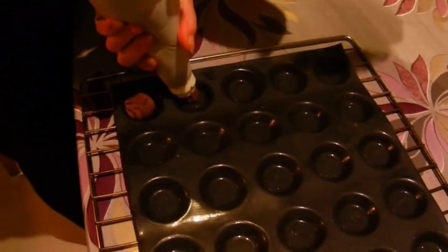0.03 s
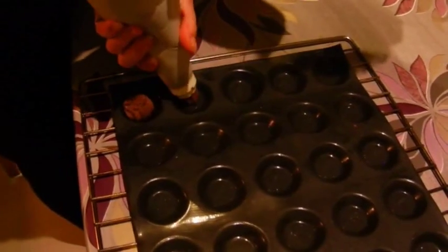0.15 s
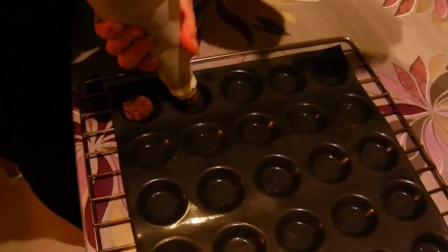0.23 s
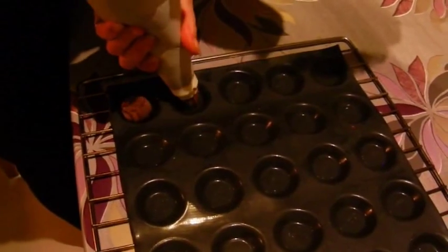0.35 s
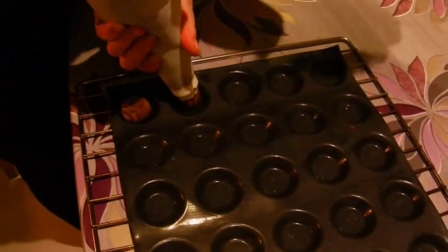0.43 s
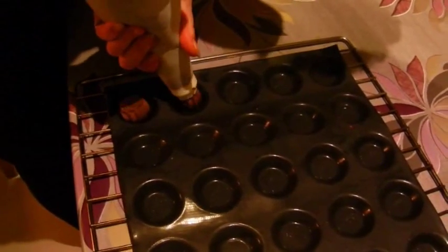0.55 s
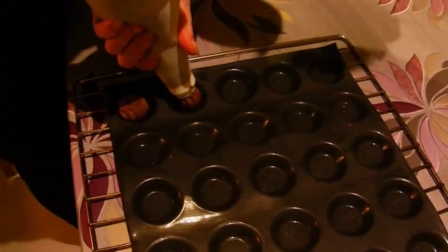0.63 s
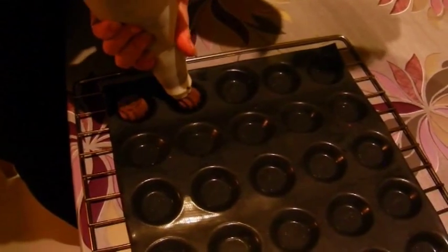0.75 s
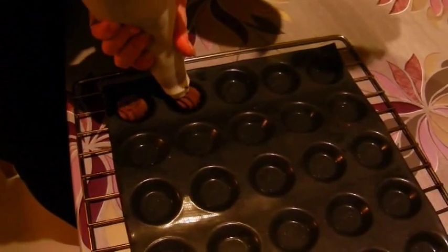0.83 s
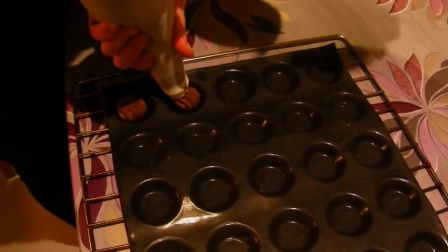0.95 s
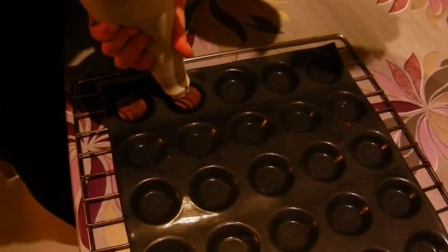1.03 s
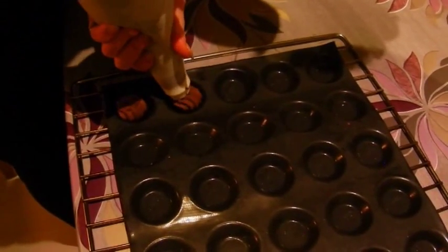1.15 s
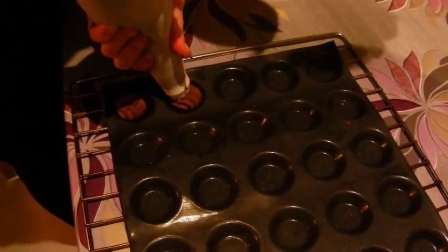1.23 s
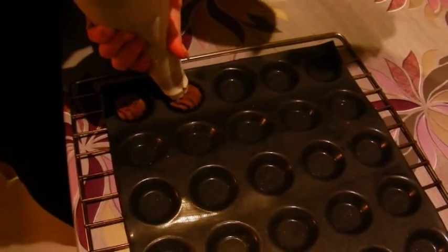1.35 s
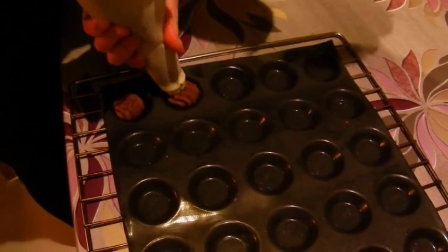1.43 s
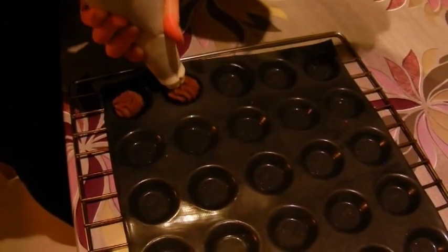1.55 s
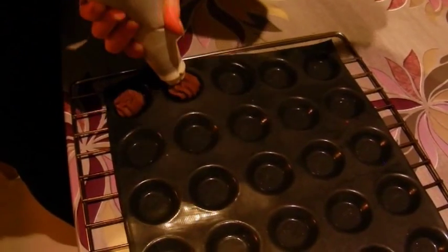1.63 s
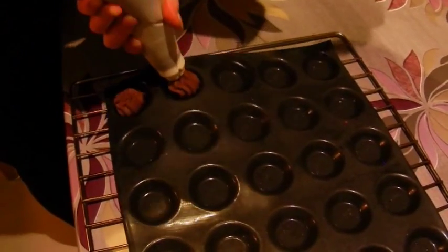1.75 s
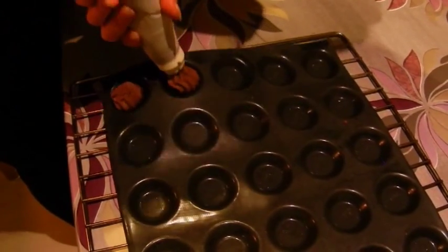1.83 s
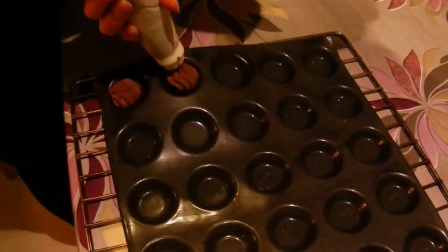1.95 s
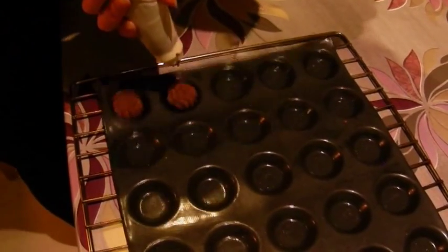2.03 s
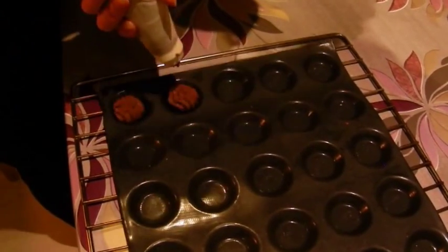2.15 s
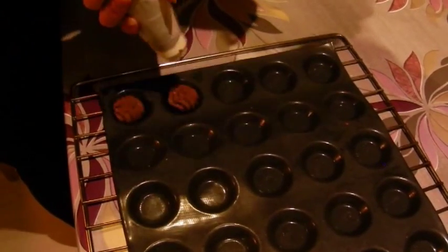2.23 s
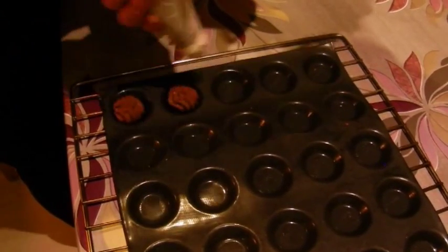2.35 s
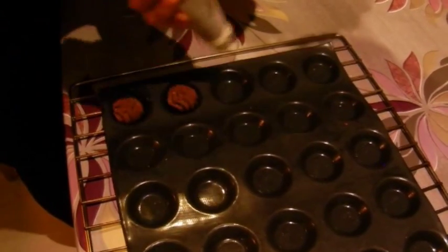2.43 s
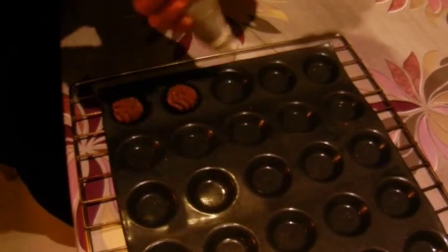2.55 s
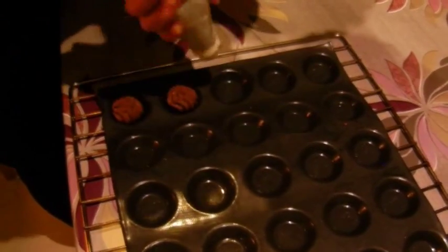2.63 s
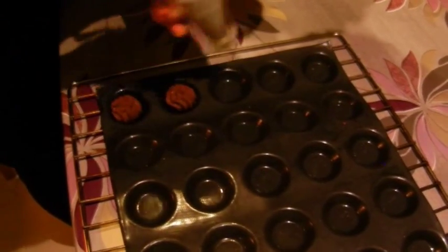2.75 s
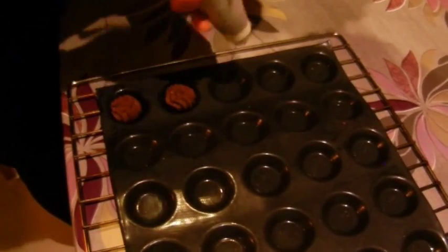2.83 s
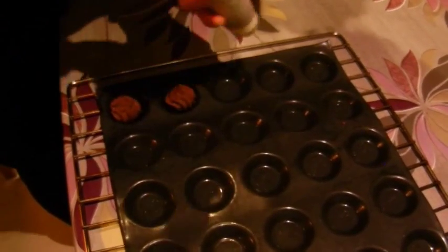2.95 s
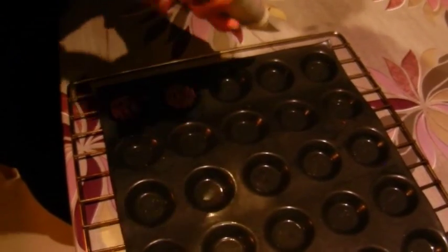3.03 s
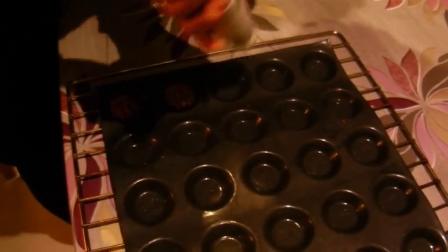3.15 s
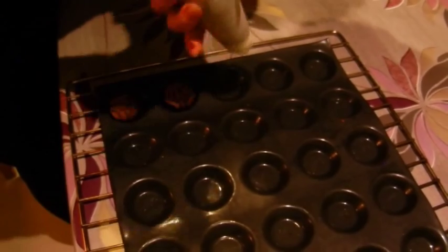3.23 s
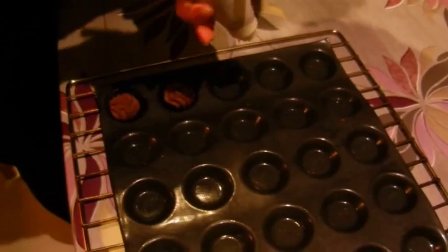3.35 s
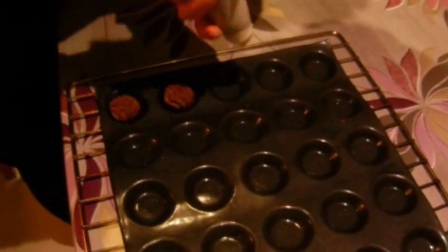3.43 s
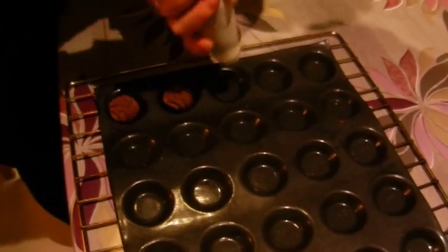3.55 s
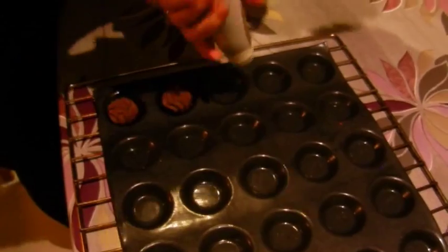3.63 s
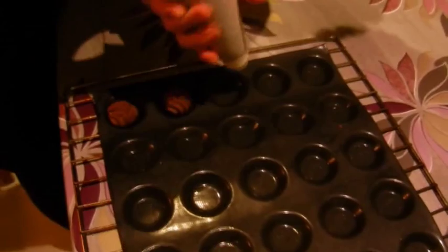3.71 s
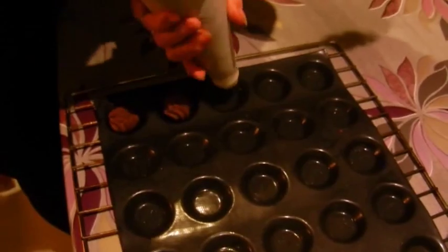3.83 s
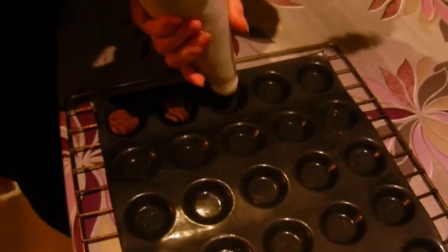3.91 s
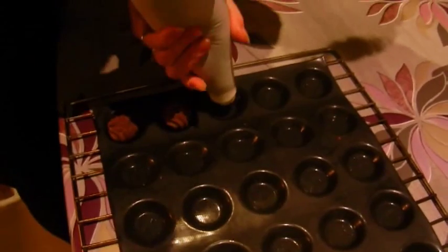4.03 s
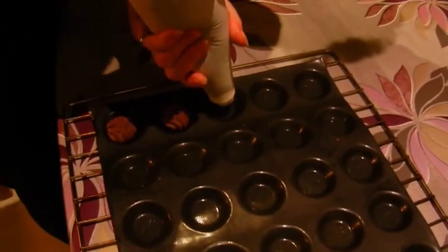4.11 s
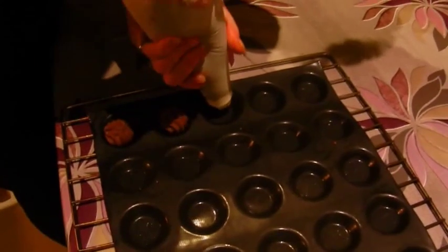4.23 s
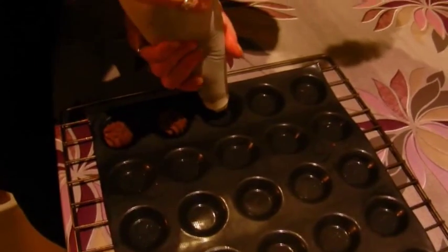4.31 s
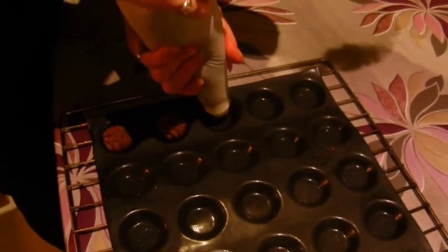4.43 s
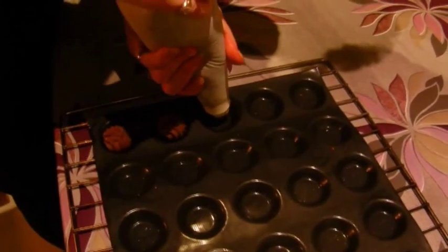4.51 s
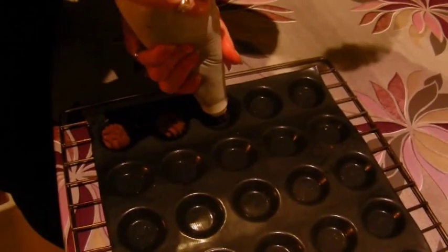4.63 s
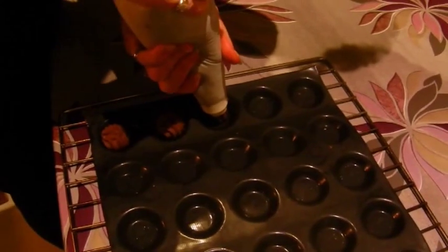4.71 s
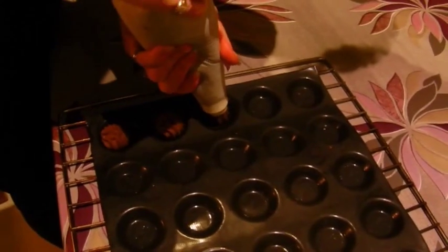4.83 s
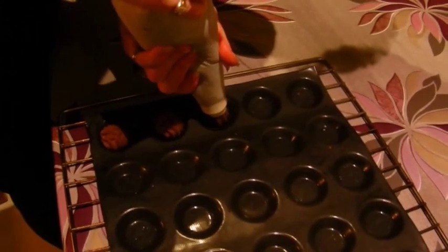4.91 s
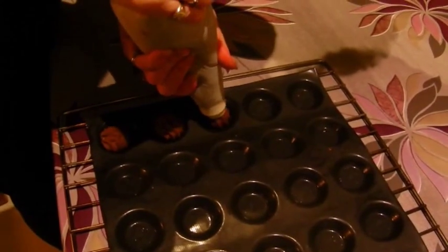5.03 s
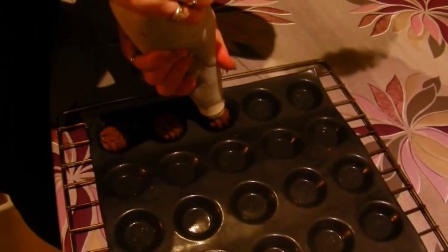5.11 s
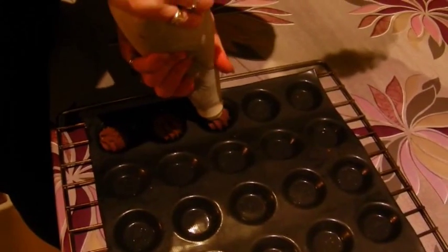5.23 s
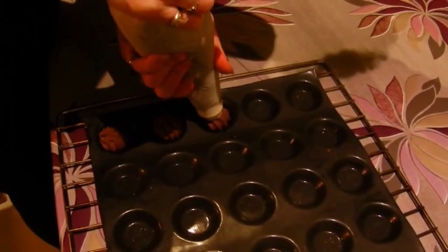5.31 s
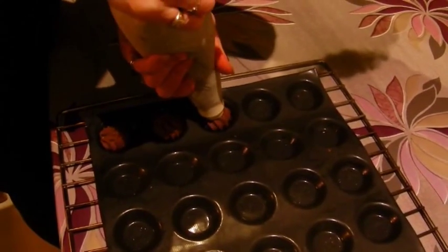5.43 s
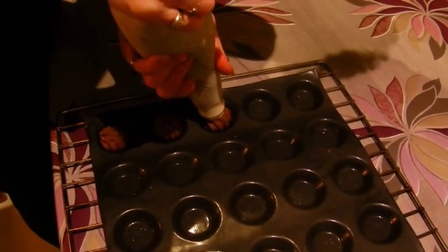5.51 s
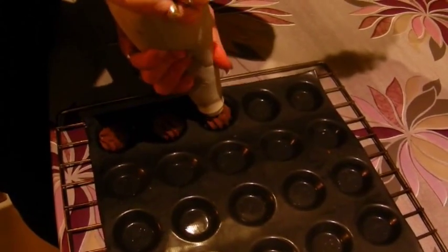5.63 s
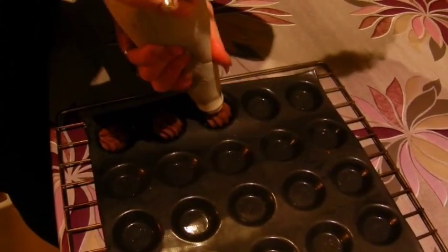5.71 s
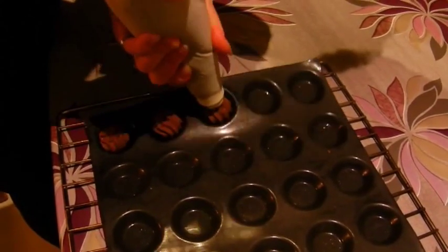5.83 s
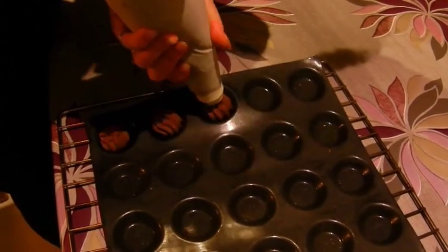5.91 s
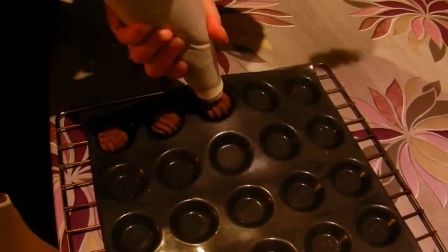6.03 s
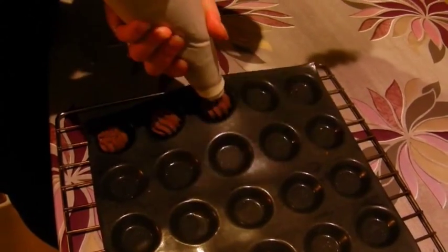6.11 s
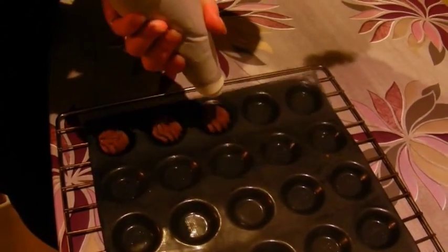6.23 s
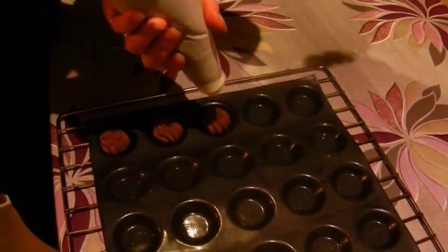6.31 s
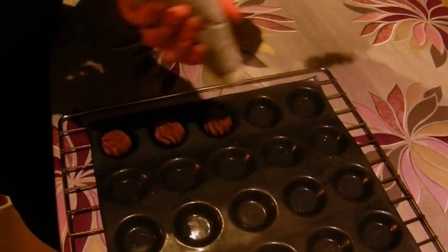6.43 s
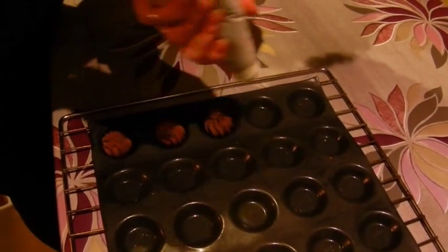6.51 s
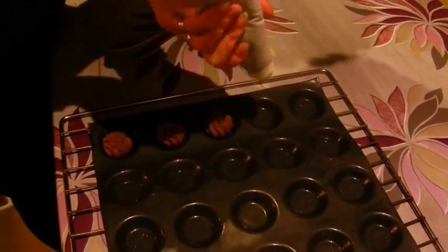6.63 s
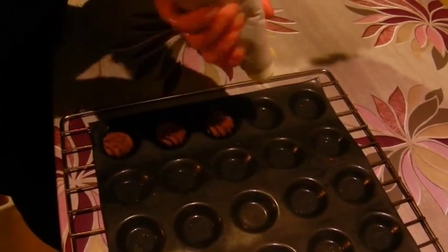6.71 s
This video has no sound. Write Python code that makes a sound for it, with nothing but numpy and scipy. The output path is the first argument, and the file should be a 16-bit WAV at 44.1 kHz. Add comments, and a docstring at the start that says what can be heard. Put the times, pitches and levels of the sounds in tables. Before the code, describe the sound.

In a small kitchen a low appliance hums steadily under soft hiss. A filled cloth bag gives small snaps and faint moist crackles, then a soft mould flops onto a wire rack with a quick clatter. Cloth rustling and dull pats follow, then quieter squeezing, a second clatter and a final swish. Close stereo microphone picks up tiny camera motor ticks.

```python
"""In a kitchen with a humming appliance, dough is piped from a cloth bag into a soft mould on a wire rack.
The mould sticks to the nozzle, lifts and flops back: struck modes of wires, table and rack feet, plus rattle.
A hand strokes and twists the bag: swelling noise layers, ringing fold snaps, wet crackles, pats and low scuffs.
A focus motor close by ticks now and then with grains and knocks in its lens modes; feedback delays
add the kitchen's echo, over banded noise for the air and drifting sines and noise for the appliance."""
import sys
import numpy as np
from scipy import signal
from scipy.fft import rfft, irfft, next_fast_len
from scipy.io import wavfile

SR = 44100
rng = np.random.default_rng(int(sys.argv[2]) if len(sys.argv) > 2 else 0)


def wav_record(signal):
    """Record a signal, one row per channel, as 16-bit PCM in the file named by sys.argv[1]."""
    frames = np.transpose(np.atleast_2d(signal))
    bounded = np.clip(frames, -1, 1)
    # unit amplitude maps onto the largest positive 16-bit level
    quanta = np.round(bounded * 32767).astype(np.int16)
    wavfile.write(sys.argv[1], SR, quanta)


N = 298557

# Colour of the room and microphone noise: (frequency [Hz], relative density [dB per Hz])
AIR_COLOUR = [(20, -33), (35, -32), (60, -7), (90, -14), (150, -9), (280, -21), (340, -16.5), (450, -18.5),
              (870, -22), (1700, -24.5), (4000, -31.5), (9000, -39), (12500, -38.5), (16000, -45)]
# Left-right likeness of that noise: (frequency [Hz], likeness [-1 to 1])
AIR_LIKENESS = [(25, .4), (60, -0.26), (180, -0.18), (550, -0.1), (1650, -0.26), (5000, -0.36),
                (15000, -0.085)]
AIR_DB = -46.5   # rms before the final trim

# Appliance: shaft orders 1, 4, 6, 8, 12, mains buzz at multiples of 100 Hz, and other steady hum tones:
# (frequency [Hz], mean level before trim and balance [dB rms], lag of the left [rad])
HUM_PARTIALS = [(33.9, -65, .6), (100, -51, .3), (135.7, -60, .55), (200, -57, .3), (203.5, -40, .13),
                (271.3, -61, 0), (300, -63, .2), (400, -65, .3), (407, -66, .1), (463, -67, .2),
                (509, -68, .2), (608.6, -65, .2), (710, -69, .2)]
# Motor noise in the appliance's case:
# (frequency [Hz], width of each of two passes [Hz], level before trim and balance [dB rms])
CASE_RESONANCES = [(100, 58, -54.5), (192.6, 29, -55), (253.3, 51, -55), (610, 170, -76)]
APPLIANCE_BALANCE_DB = -4   # left minus right

KITCHEN_T60_S, WALL_CUT_HZ = 0.32, 4600   # decay of the lows; treble loss per round
CUTOFF_HZ = 15750

# Focus motor steps: (time [s], level [dB])
MOTOR_STEPS = [(0.207, -35.5), (0.4106, -45), (0.5, -52), (0.61, -38), (3.4063, -35.5), (3.5128, -40),
               (3.712, -38), (3.8114, -35.5), (3.9055, -46), (4.111, -37.5), (4.2118, -36.5),
               (4.3148, -36.5), (4.407, -42), (4.517, -39.5), (4.9143, -39)]
# Modes of the lens barrel: (frequency [Hz], level [dB], t60 [s])
LENS_MODES = [(976, -10.5, 0.084), (1200, 10.5, 0.0029), (1380, 0, 0.037), (2680, 3.5, 0.009),
              (3920, -0.5, 0.0015), (5540, -35, .006), (10950, -1, 0.0027)]

# Dull pats of the palm and low scuffs of the hand on the full bag:
# (time [s], level [dB], pitch [Hz], t60 [s])
PATS_AND_SCUFFS = [(2.432, -33.5, 604, .03), (3.094, -36, 510, .035), (3.15, -27.5, 614, 0.031),
                   (3.396, -36, 622, .07), (3.429, -35.5, 623, .06), (3.478, -45, 620, .08),
                   (3.499, -39.5, 584, .12), (6.046, -34, 285, .08), (6.089, -44, 407, 0.048),
                   (6.484, -27.5, 301, 0.012), (6.516, -35.5, 590, 0.031), (6.572, -28, 462, 0.017),
                   (6.613, -29.5, 494, 0.018)]

# Moist dough crackles while the bag is gripped: (time [s], level [dB])
GRIP_LEVELS = [(0, -45), (.45, -50), (.9, -51), (1.299, -56), (1.9, -58), (2.3, -53), (3.3, -42),
               (4.0, -54), (4.5, -45), (5.0, -61), (5.3, -70), (6.77, -46)]
CRACKLES_PER_S, CRACKLE_CYCLES, CRACKLE_SPREAD_DB = 90, 5.1, 4.0   # cycles to fall 60 dB

# Folds of the bag snap: (time [s], level [dB], pitch [Hz], treble re level [dB], t60 [s])
FOLD_SNAPS = [(0.016, -30, 1860, -11, 0.011), (0.131, -36, 1560, -18, 0.005),
              (0.161, -34.5, 902, -19, .008), (0.302, -37, 1320, -15, 0.0095),
              (0.366, -26.5, 2480, -16, .006), (0.373, -27.5, 1270, -21, 0.011),
              (0.772, -26, 2020, 2, 0.0022), (0.996, -48.5, 4000, 7, .004), (1.448, -53, 1500, -3, 0.0072),
              (1.59, -51.5, 1350, 11, .008), (1.798, -40, 4060, -1, 0.016), (1.838, -34, 1340, -14, 0.0074),
              (2.593, -28.5, 1450, -21, 0.011), (2.602, -29.5, 1480, -11, 0.0095),
              (3.052, -24, 2760, -20, 0.027), (3.13, -25, 1680, -14, .007), (3.445, -40, 2170, 2, 0.009),
              (3.778, -45.5, 2390, 13.5, 0.0082), (3.838, -31, 2305, -20, 0.045),
              (3.873, -39, 2450, -3, 0.015), (4.43, -28.5, 2870, -19, 0.027),
              (4.429, -28, 1600, -18, 0.0099), (4.44, -22, 1030, -12, .005), (4.606, -44, 1110, -17, .008),
              (4.832, -39, 1080, -4, 0.0049), (5.973, -46, 1090, 0, .008)]
SNAP_PAN_DB = -4.5   # left minus right

# Hand slides over the bag: (fastest motion [s], rise [s], fall [s],
# cloth swish [dB], skin drag re swish [dB], fine hiss re swish [dB])
HAND_STROKES = [(0.04, 0.046, 0.089, -73, 6, -2), (0.365, .05, 0.06, -51, -6, -2.5),
                (0.80, 0.027, 0.21, -61, -3, -1), (1.43, 0.045, 0.15, -61.5, 7.5, -6),
                (1.892, .02, 0.043, -53, -10, -0.5), (2.373, 0.1, 0.12, -41, -2.5, -4.5),
                (2.53, 0.091, 0.081, -43.5, -2, -7.5), (2.635, 0.12, .14, -38.5, -2.5, -5),
                (2.885, 0.079, 0.14, -37.5, -0.5, 0), (2.957, 0.061, 0.13, -29, -2.5, -8),
                (3.05, 0.055, 0.067, -40, 1.5, -14), (3.11, 0.055, 0.16, -47, 5, -4.5),
                (3.191, 0.071, 0.08, -39, -1.5, -4), (3.27, .07, 0.13, -47.5, 3.5, -1.5),
                (3.42, 0.071, .06, -54, 5, 2), (3.47, 0.18, 0.48, -71, 20.5, -8),
                (3.51, .05, 0.05, -46.5, -3, -4.5), (3.685, 0.12, 0.076, -45.5, -3.5, -4),
                (3.901, 0.061, 0.1, -49.5, -1.5, 9), (3.965, 0.054, .06, -55.5, -6, 8),
                (4.447, 0.034, 0.084, -55, 5, 3), (4.762, 0.02, 0.046, -48, -4.5, 6.5),
                (4.92, 0.21, 0.15, -58.5, 3, 4.5), (6.43, .08, 0.11, -52.5, -2, -2),
                (6.52, 0.097, 0.084, -43, -0.5, -2), (6.57, 0.093, .035, -40.5, -10, -3),
                (6.731, .14, 0.065, -35, -5.5, -4.5)]
# Broad resonances of the cloth: (frequency [Hz], width [Hz], level [dB])
CLOTH_RESONANCES = [(4030, 3300, -6.5), (5480, 2630, 1), (6350, 4250, -5.5)]
# Broad resonances of the skin drag: (frequency [Hz], width [Hz], level [dB])
SKIN_RESONANCES = [(1370, 410, 9), (2420, 560, 7), (2730, 1870, 3.5)]
# Broad resonances of the dull rustle: (frequency [Hz], width [Hz], level [dB])
RUSTLE_RESONANCES = [(660, 360, 12.5), (435, 600, 9.5), (1070, 140, 9)]
# A stroke is 20 dB down one rise before and one fall after its peak.
SWELL_POWER = 1.63   # 2 = bell, 1 = spike
RUSTLE_DB, RUSTLE_SLOPE = -9.5, 0.43   # re skin drag; extra dB per dB that drag leads swish
SHEEN_DB, SHEEN_SLOPE = -3, 0.6   # topmost hiss re fine hiss; extra dB per dB that hiss leads swish

# The mould meets the rack: (time [s], wires [dB], crack [dB], table thud [dB])
MOULD_CONTACTS = [(2.0137, -20, -28, -30), (2.0244, -27, -8, -46), (2.0309, -18.5, -18, -33),
                  (2.0376, -25, -37, -45), (2.054, -46, -38, -26.5), (2.061, -31, -44, -44),
                  (2.078, -30, -38, -30), (2.097, -23, -23, -31), (2.11, -35, -45, -50),
                  (2.138, -32.5, -31, -30), (2.17, -43, -35, -66), (6.173, -28.5, -38, -45),
                  (6.1833, -22, -16, -46), (6.19, -22.5, -16, -30), (6.2111, -24, -4.5, -28.5),
                  (6.218, -32, -29, -44), (6.228, -30, -40, -28.5), (6.239, -29, -46, -54),
                  (6.253, -36, -42, -33), (6.282, -34, -22, -41)]
# Rack wires damped by the soft mould: (frequency [Hz], level [dB], t60 [s])
WIRE_MODES = [(444, -12.5, 0.02), (707, -5.5, 0.031), (758, 2, 0.018), (830, -1.5, 0.037),
              (975, -9.5, 0.013), (1090, -2.5, .025), (1189, -4.5, 0.027), (1285, -9.5, 0.023),
              (1430, -14, 0.018)]
# Crossings of the wires: (frequency [Hz], level [dB], t60 [s])
CROSSING_MODES = [(1840, -5.5, 0.0054), (2780, 1.5, 0.0016), (3660, -5, .002)]
# Table top: (frequency [Hz], level [dB], t60 [s])
TABLE_MODES = [(155, -5.5, 0.13), (205, 2, 0.025), (234.5, -4, 0.11), (326, -4, 0.018), (407, -18, 0.1)]
# The rack rocks on its feet: (time [s], level [dB])
RACK_SWAYS = [(2.03, -35.5), (2.087, -32), (2.124, -44), (2.252, -47), (6.045, -50), (6.19, -36),
              (6.23, -46)]
# Rack feet: (frequency [Hz], level [dB], t60 [s])
FEET_MODES = [(74.2, -14, 1), (86, 8, 0.13)]
RATTLE_DB, RATTLE_T60_S = -3.5, 0.078   # re wires


def from_db(db):
    """Turns dB into an amplitude factor."""
    return 10 ** (np.asarray(db) / 20)


def rms_one(x):
    """Scales a sound to an rms of 1."""
    return x / np.sqrt(np.mean(x ** 2) + 1e-20)


def pan(x, db):
    """Shares a sound between left and right, db apart."""
    return np.array([x * from_db(db / 2), x * from_db(-db / 2)])


def at_hz(points, hz):
    """Reads a curve at hz, straight between points on a log frequency scale."""
    point_hz, value = np.transpose(points)
    return np.interp(np.log(hz), np.log(point_hz), value)


def drift(rate_hz):
    """Slow noise of spread 1, computed on every 40th sample."""
    r = np.exp(-80 * np.pi * rate_hz / SR)
    white = rng.standard_normal(N // 40 + 2002)
    slow = signal.lfilter([1], [1, -2 * r, r * r], white)[2000:]   # skip the settling
    return np.interp(np.arange(N) / 40, np.arange(len(slow)), rms_one(slow - slow.mean()))


def ring(clicks, hz, t60):
    """A unit click sets a decaying sine of starting height 1 ringing."""
    r, w = from_db(-60 / (t60 * SR)), 2 * np.pi * hz / SR
    return signal.lfilter([0, np.sin(w)], [1, -2 * r * np.cos(w), r * r], clicks + 1e-18)


def resonance(x, hz, width_hz):
    """One damped resonance lets through the sound around hz."""
    r = np.exp(-np.pi * width_hz / SR)
    poles = [1, -2 * r * np.cos(2 * np.pi * hz / SR), r * r]
    return signal.lfilter([(1 - r * r) / 2, 0, (r * r - 1) / 2], poles, x)


def band(x, low_hz, high_hz):
    """Keeps the sound between two frequencies."""
    return signal.sosfilt(signal.butter(2, [low_hz, high_hz], "band", fs=SR, output="sos"), x)


def soft(x, hz):
    """A yielding contact takes the edge off a click."""
    return signal.sosfilt(signal.butter(2, hz, fs=SR, output="sos"), x)


def strike(times, levels_db, modes, spread_db):
    """Each blow strikes every mode with a strength of its own."""
    at, out = (np.array(times) * SR).astype(int), np.zeros(N)
    luck = rng.standard_normal((len(at), len(modes)))
    for k, ((hz, level_db, t60), scatter) in enumerate(zip(modes, luck.T)):
        clicks = np.zeros(N)
        clicks[at] = from_db(levels_db + level_db + spread_db * scatter)
        out += (-1) ** k * ring(clicks, hz, t60)   # neighbouring modes start in opposite sense
    return out


def puffs(times, levels_db, t60):
    """White noise starts at each time and dies away."""
    starts = np.zeros(N)
    starts[(np.array(times) * SR).astype(int)] = from_db(levels_db)
    envelope = signal.lfilter([1], [1, -from_db(-60 / (t60 * SR))], starts + 1e-18)
    return envelope * rng.standard_normal(N)


def alike_pair(alike):
    """Left and right noises share a part."""
    mid, side = rng.standard_normal((2, N))
    return np.sqrt((1 + alike) / 2) * mid + np.sqrt((1 - alike) / 2) * side * [[1], [-1]]


def air():
    """Room and microphone noise in half-octave bands, each with its own likeness, and a top strip."""
    out, edges = 0, 20 * 2 ** np.arange(0, 10, .5)
    together = 0.067 * drift(45.0)   # all bands flutter a little in step
    white = rng.standard_normal((2, 2, N))   # neighbouring bands get unrelated noise
    for k, (low, high) in enumerate(zip(edges, edges[1:])):
        mid, side = band(white[k % 2], low, high)
        hz = np.sqrt(low * high)
        alike = at_hz(AIR_LIKENESS, hz)
        gain = from_db(at_hz(AIR_COLOUR, hz) + 0.27 * drift(9.9) + together)
        out = out + gain * (np.sqrt(1 + alike) * mid + np.sqrt(1 - alike) * side * [[1], [-1]])
    mid, side = band(white[1], edges[-1], 15000)
    top_gain = from_db(at_hz(AIR_COLOUR, edges[-1]) + together)
    out = out + top_gain * (mid + side * [[1], [-1]])
    return from_db(AIR_DB) * rms_one(out)


def appliance():
    """Sines of fixed pitch waver in level, and turbulence rings in the case."""
    t, out = np.arange(N) / SR, np.zeros((2, N))
    for hz, level_db, lag in HUM_PARTIALS:
        phase = 2 * np.pi * (hz * t + rng.random())
        height = np.sqrt(2) * from_db(level_db + 1.44 * drift(26.0))
        out += height * np.array([np.sin(phase - lag), np.sin(phase)])
    noise = alike_pair(0.046)
    for hz, width_hz, level_db in CASE_RESONANCES:
        rumble = resonance(resonance(noise, hz, width_hz), hz, width_hz)
        out += from_db(level_db) * rms_one(rumble)
    return pan(0.84, APPLIANCE_BALANCE_DB)[:, None] * out


def kitchen(x):
    """Echoes circle in six feedback delays a side, duller on every round."""
    size = next_fast_len(N + SR)
    hz = np.arange(size // 2 + 1) * SR / size
    lags = rng.uniform(.008, .03, (2, 6))
    out = np.zeros((2, size // 2 + 1), complex)
    for side in range(2):
        for k, lag in enumerate(lags[side]):
            loss = from_db(-60 * lag / KITCHEN_T60_S) / (1 + 1j * hz / WALL_CUT_HZ)
            loop = loss * np.exp(-2j * np.pi * hz * lag)
            out[side] += (-1) ** k * loop / (1 - loop)
    for lag in (.0013, .0037):
        delay = np.exp(-2j * np.pi * hz * lag)
        out *= (delay - .6) / (1 - 0.37 * delay)   # clutter scatters each echo
    return irfft(out * rfft(x, size), size)[:, :N]


def focus_motor():
    """Each step knocks and briefly grinds in the lens barrel's modes, then chatters out as bright noise."""
    s, level = np.transpose(MOTOR_STEPS)
    t = np.arange(N) / SR
    envelope = sum(from_db(db) * np.exp(-((t - at - .0035) / 0.012) ** 2) for at, db in MOTOR_STEPS)
    meshing = rng.random(N) < 3500 / SR   # about 3500 grains a second
    teeth = envelope * rng.standard_normal((len(LENS_MODES), N)) * meshing
    grind = np.zeros(N)
    for grains, (hz, mode_db, t60) in zip(teeth, LENS_MODES):
        grind += from_db(mode_db - 15.5) * ring(grains, hz, t60)
    knock = strike(s + 0.0012, level - 6.5, LENS_MODES, spread_db=4.0)
    chatter = band(puffs(s, level - 16, 0.13), 2900, 17000)
    return grind + knock + chatter


def pats_and_scuffs():
    """The soft filled bag answers the hand with damped low notes, short for pats, overlapping for scuffs."""
    out = np.zeros(N)
    for s, level_db, hz, t60 in PATS_AND_SCUFFS:
        click = np.zeros(N)
        click[int(s * SR)] = from_db(level_db)
        out += ring(click, hz, t60)
    return soft(out, 1500)


def crackle():
    """Small wet grains come at random, each ringing a few cycles."""
    s, level_db = np.transpose(GRIP_LEVELS)
    excess_db = CRACKLE_SPREAD_DB * np.minimum(rng.exponential(1, N), 4.0)
    sizes = from_db(excess_db) * (rng.random(N) < CRACKLES_PER_S / SR)
    pitches, dealt = np.geomspace(850, 3000, 8), rng.integers(0, 8, N)
    grains = sum(ring(sizes * (dealt == k), hz, CRACKLE_CYCLES / hz) for k, hz in enumerate(pitches))
    return from_db(np.interp(np.arange(N) / SR, s, level_db)) * grains


def snaps():
    """A fold lets go: a click that rings a few cycles, a bright spit and a short papery tail."""
    out = np.zeros(N)
    for s, level_db, hz, treble_db, t60 in FOLD_SNAPS:
        at = int(s * SR)
        click = np.zeros(min(4000, N - at))
        click[0] = 1
        t = np.arange(len(click)) / SR
        noise = rng.standard_normal(len(click))
        papery = from_db(-4.0) * noise * np.exp(-t / 0.015)
        body = band(ring(click, hz, t60) + papery, hz / 3.8, hz * 1.44)
        spit = from_db(treble_db) * band(noise * np.exp(-t / 0.0012), 1900, 8600)
        out[at:at + len(click)] += from_db(level_db) * (body + spit)
    return out


def stroke_layer(grain, peaks, low_hz, high_hz, alike, pan_db):
    """One layer of friction: grainy stereo noise, coloured by broad resonances if peaks are given."""
    noise = alike_pair(alike) * grain * from_db(1.17 * drift(24.0))
    if peaks:
        noise = sum(from_db(db) * (-1) ** k * resonance(noise, hz, width_hz)
                    for k, (hz, width_hz, db) in enumerate(peaks))
    return pan(0.93, pan_db)[:, None] * rms_one(band(noise, low_hz, high_hz))


def strokes():
    """Skin drags on cloth: grainy noise in broad resonances, fine hisses above and a dull rustle below."""
    t, powers = np.arange(N) / SR, np.zeros((5, N))
    grain = from_db(0.17 * drift(80.0) + 1.63 * drift(8.9))   # shared by all layers
    swish = stroke_layer(grain, CLOTH_RESONANCES, 1700, 12000, alike=0.37, pan_db=1.0)
    drag = stroke_layer(grain, SKIN_RESONANCES, 1850, 3470, alike=0.64, pan_db=-3.6)
    hiss = stroke_layer(grain, None, 8900, 13300, alike=0.16, pan_db=2.0)
    sheen = stroke_layer(grain, None, 14000, 18000, alike=0.13, pan_db=-2.0)
    rustle = stroke_layer(grain, RUSTLE_RESONANCES, 308, 1730, alike=0.94, pan_db=-3.5)
    for s, rise, fall, swish_db, drag_db, hiss_db in HAND_STROKES:
        near = slice(max(int((s - 2 * rise) * SR), 0), int((s + 2 * fall) * SR))
        away = np.where(t[near] < s, (s - t[near]) / rise, (t[near] - s) / fall)
        swell_db = swish_db - 20 * away ** SWELL_POWER
        rustle_db = RUSTLE_DB + (1 + RUSTLE_SLOPE) * drag_db
        sheen_db = SHEEN_DB + (1 + SHEEN_SLOPE) * hiss_db
        mix_db = np.array([0, drag_db, hiss_db, rustle_db, sheen_db])
        powers[:, near] += from_db(2 * (swell_db + mix_db[:, None]))   # overlapping strokes add as power
    layers = (swish, drag, hiss, rustle, sheen)
    return sum(np.sqrt(power) * sound for power, sound in zip(powers, layers))


def flops():
    """Every contact rings the wires, cracks briefly, shakes the table and leaves a short rattle."""
    s, wires_db, crack_db, thud_db = np.transpose(MOULD_CONTACTS)
    wires = soft(soft(strike(s, wires_db, WIRE_MODES, spread_db=3.5), 2000), 2000)
    crack = band(strike(s, crack_db, CROSSING_MODES, spread_db=1), 1300, 5500)
    loose = from_db(1.0 * drift(130.0))   # loose wires touch unevenly
    wire_rattle = soft(puffs(s + .003, wires_db + RATTLE_DB, RATTLE_T60_S), 2400)
    crack_rattle = puffs(s, crack_db - 15.5, 0.023)
    rattle = soft(band(loose * (wire_rattle + crack_rattle), 650, 4300), 5300)
    thud = band(strike(s, thud_db, TABLE_MODES, spread_db=4), 60, 610)
    sway_s, sway_db = np.transpose(RACK_SWAYS)
    sway = band(strike(sway_s, sway_db, FEET_MODES, spread_db=2), 45, 160)
    return wires + crack + rattle + thud + sway


def scene():
    """Places each source left to right and sends mould, folds and hand into the kitchen's echo."""
    background = pan(0.96, -0.23)[:, None] * air() + appliance()
    hand, folds, mould = pats_and_scuffs(), snaps() + crackle(), flops()
    near = pan(focus_motor(), -0.39) + pan(hand, -4.0) + pan(folds, SNAP_PAN_DB) + pan(mould, -5.0)
    echoes = from_db(-11.5) * kitchen(mould + folds + hand)
    return background + echoes + strokes() + near


def record(dry):
    """A steep low-pass cuts the top."""
    return signal.sosfilt(signal.ellip(12, .5, 75, CUTOFF_HZ, fs=SR, output="sos"), dry)


dry = scene()
out = record(dry)
wav_record(out)
```